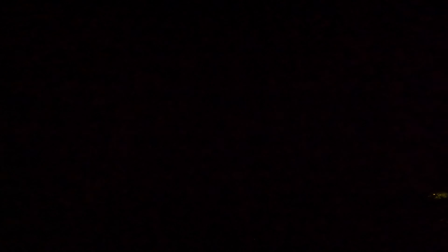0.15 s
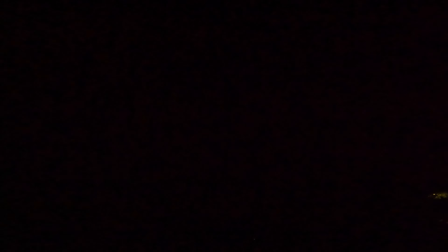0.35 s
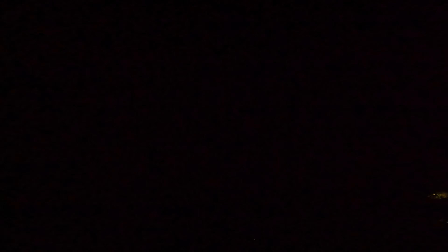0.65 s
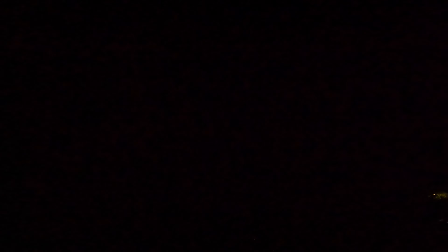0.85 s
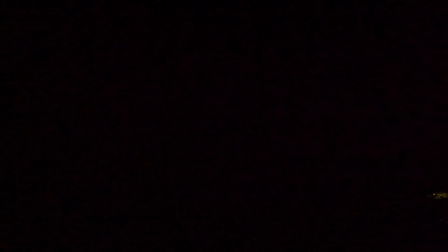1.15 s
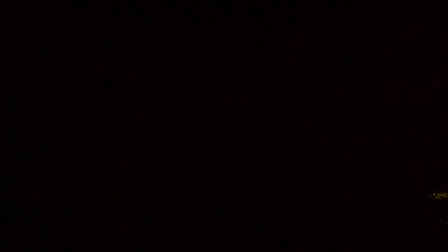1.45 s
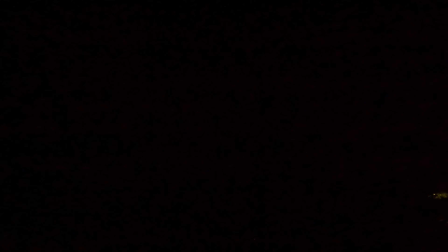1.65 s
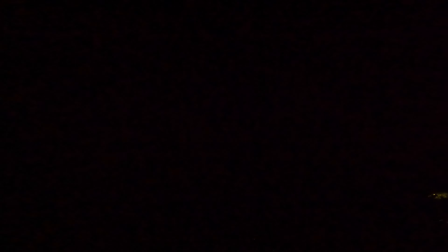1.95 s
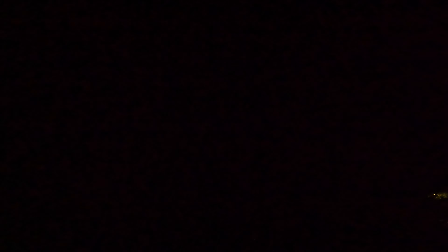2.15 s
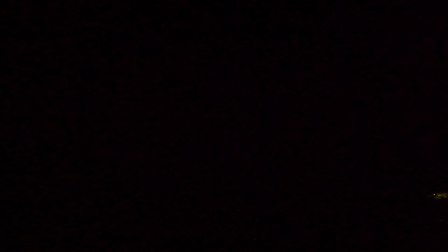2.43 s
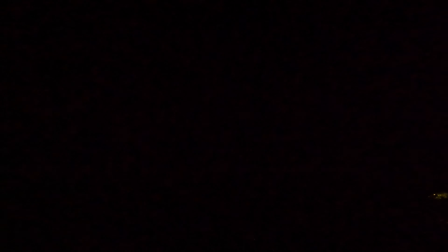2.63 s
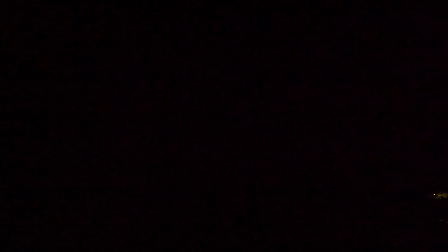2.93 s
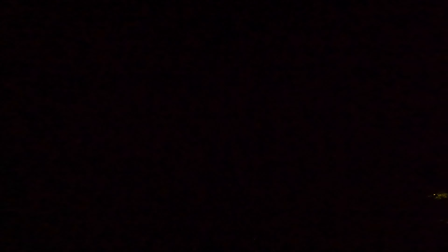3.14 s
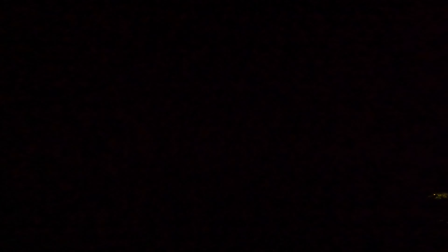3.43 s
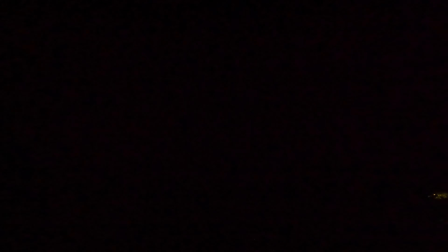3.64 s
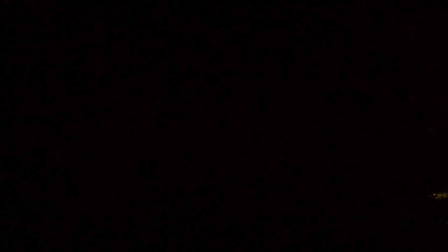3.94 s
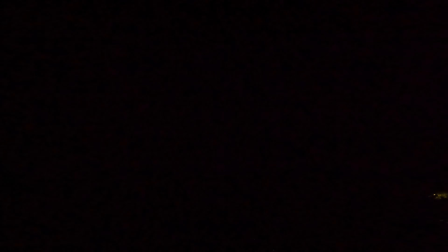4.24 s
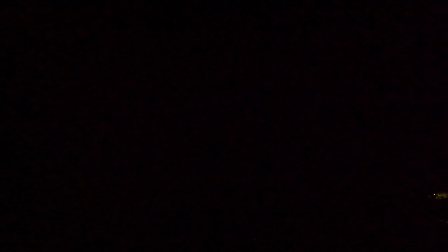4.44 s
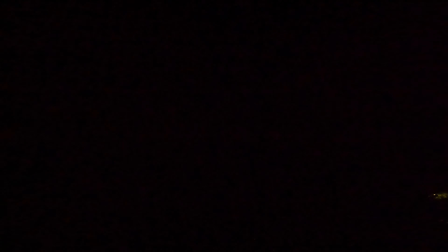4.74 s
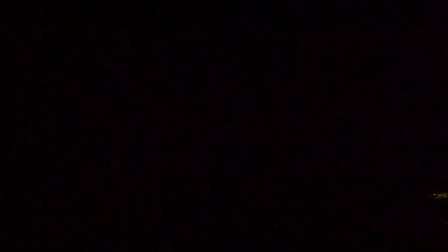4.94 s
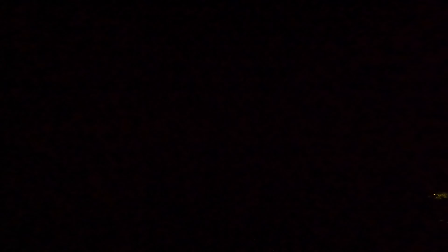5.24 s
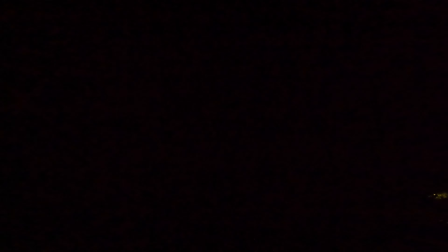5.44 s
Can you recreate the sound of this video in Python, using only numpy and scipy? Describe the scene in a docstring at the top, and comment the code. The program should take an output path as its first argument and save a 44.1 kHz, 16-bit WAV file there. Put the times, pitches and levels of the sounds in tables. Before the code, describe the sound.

Night rain outdoors, heard in mono from close to hard ground with a wall nearby. Throughout, a soft mid-pitched wash lies under irregular patter and many crisp, dry ticks of single drops, each with a tiny splash and quick reflection. The rain thickens from about 1 to 2.5 s, then thins a little. At 0 s a brief low thunder thud fades into a faint mutter; a few soft bumps come near 0.6 s, and from 1 s muffled thuds follow every tenth of a second or so. A heavier knock lands at 2.2 s. From 2.7 s the thunder surges: dense rumble, hollow booms and hard knocks crowd together, strongest around 2.9 to 3.7 s, with a rough tearing edge and slight crackle. It rolls on in uneven waves, with further strong knocks near 3.9, 4.5 and 4.95 s, still rumbling at the 5.6 s cut. Very faint, high cricket trills flutter at 1.6, 2.2 to 2.9 and 4.5 s.

```python
"""Thunder behind rain at night

Distant thunder mutters and swells into louder peals. Dense streams of shock fronts make the roll,
shaped noise makes the peals, and short pressure swings make the knocks that stand out of them.
Single drops tick on hard ground close by, filtered noise and random impacts make the rain around
them, and narrow bands of fluttering noise make a few faint cricket trills."""
import sys
import numpy as np
from scipy import signal
from scipy.fft import rfft, irfft
from scipy.io import wavfile
from scipy.ndimage import map_coordinates

SR = 44100
rng = np.random.default_rng(int(sys.argv[2]) if len(sys.argv) > 2 else 0)


def int16_out(signal):
    """Quantize to a 16-bit WAV file."""
    q = np.round(np.clip(np.atleast_2d(signal).T, -1, 1) * 32767)
    wavfile.write(sys.argv[1], SR, q.astype(np.int16))


N = 246061


def amp(db):
    """Decibels to gain."""
    return 10 ** (np.asarray(db) / 20)


def unit(x):
    """x at rms 1."""
    return x / np.sqrt(np.mean(x ** 2) + 1e-20)


def along(points, hz):
    """(Hz, value) points read on a log axis."""
    f, v = np.transpose(points)
    return np.interp(np.log(hz + 1), np.log(f + 1), v)


def curves(rows):
    """One value per sample for each column after the time."""
    s, *cols = np.transpose(rows)
    return [np.interp(np.arange(N) / SR, s, c) for c in cols]


def wobble(rate):
    """A smooth random curve, rate knots a second."""
    return map_coordinates(rng.standard_normal(int(N * rate / SR) + 4), [np.arange(N) * rate / SR])


def coloured(x, spectrum, size=8192):
    """x through a causal filter with the given spectrum."""
    cepstrum = irfft(np.log(amp(along(spectrum, np.fft.rfftfreq(size, 1 / SR)))))
    cepstrum[1:size // 2] *= 2
    cepstrum[size // 2 + 1:] = 0
    return signal.fftconvolve(x, irfft(np.exp(rfft(cepstrum))))[:len(x)]


def impacts(rate, spread_db):
    """Randomly timed impulses of either sign and log-normal size."""
    chance, size = rng.random(N), rng.standard_normal(N)
    return (chance < rate / SR) * rng.choice([-1, 1], N) * amp(spread_db * np.minimum(size, 2))


def steady(x, span):
    """x held at rms 1 over about span seconds, keeping its faster grain."""
    window = np.hanning(int(span * SR) + 3)
    power = signal.fftconvolve(x ** 2, window, "same") / signal.fftconvolve(np.ones(len(x)), window, "same")
    return x / np.sqrt(np.abs(power) + 1e-12)


def add(track, s, sound):
    """Mix sound into track from time s."""
    start = max(round(s * SR), 0)
    part = track[start:start + len(sound)]
    part += sound[:len(part)]


def resonant(x, modes):
    """x with a band around each resonance lifted or cut."""
    for hz, width_hz, lift_db in modes:
        x = x + (amp(lift_db) - 1) * signal.lfilter(*signal.iirpeak(hz, hz / width_hz, fs=SR), x)
    return x


# Peals that stand out of the roll. Each row: start in seconds, length in seconds, overall level in dB,
# then edge, deep part and boom in dB relative to it before their trims, and boom pitch in Hz.
PEAL_EVENTS = [(0, 0.016, -25.5, -8, 0, -2, 290), (0.203, 0.11, -45, -20, 10, -3, 158),
               (0.433, 0.02, -31, -12, -8, -8, 200), (0.529, 0.058, -33.5, -9, -6, -10, 218),
               (0.833, 0.028, -32.5, -12.5, -3, 1.5, 240), (0.966, 0.034, -38, 4.5, -8, -2, 283),
               (0.617, 0.031, -22, -20, -7, -5, 277), (1.019, 0.036, -19, -9, -8.5, -8.5, 253),
               (1.11, 0.032, -23, -17.5, -19, -9, 172), (1.189, 0.013, -20.5, -19, -18, -7, 310),
               (1.272, 0.022, -26, -10.5, -20, -3, 180), (1.376, 0.065, -22, -21, -27, -16, 154),
               (1.501, 0.019, -22, -10.5, -18, -0.5, 318), (1.61, 0.038, -22.5, -20.5, -12, -5, 176),
               (1.725, 0.066, -23, -14, -22, -3.5, 340), (1.771, 0.021, -23.5, -8.5, -20, -4, 344),
               (1.87, 0.052, -22, -19, -24, -12, 163), (2.04, 0.035, -21, -18, -13, -3, 312),
               (2.162, 0.044, -21.5, -9, -22, -5.5, 180), (2.34, 0.12, -19, -12, -17, -11, 158),
               (2.51, 0.04, -30, -15, -17, -1, 168), (2.655, 0.041, -27, 0.5, -9, -10, 273),
               (2.7, 0.054, -19.5, -2.5, -16, 3, 262), (2.759, 0.086, -13.5, -6.5, -26, -8, 296),
               (2.85, 0.02, -19, -4, -14, -2, 305), (2.89, 0.034, -18, -7.5, -14, -3.5, 297),
               (2.972, 0.048, -15.5, -11.5, -20, 3, 301), (3.024, 0.03, -16, -5.5, -24, -1.5, 310),
               (3.09, 0.022, -23, 0, -9, -13, 290), (3.191, 0.046, -19.5, -7, -15, -2, 231),
               (3.256, 0.03, -14.5, -6, -16, -7, 302), (3.35, 0.0067, -20, 3.5, -22, -9, 335),
               (3.535, 0.043, -18.5, -9, -19, -3, 356), (3.591, 0.055, -15.5, -11, -22, -3, 172),
               (3.852, 0.027, -14.5, -9.5, -33, -2.5, 320), (3.918, 0.029, -17.5, -6, -24, -3, 308),
               (4.075, 0.067, -24.5, -1.5, -15, -11, 262), (4.135, 0.042, -15.5, -10, -16, -2, 199),
               (4.211, 0.045, -17.5, -15, -21, -2.5, 260), (4.411, 0.027, -22.5, -3, -12, -6, 263),
               (4.651, 0.35, -20, -11.5, -13, -7.5, 275), (4.809, 0.049, -21, -12, -20, 3, 277),
               (4.864, 0.12, -15.5, -12, -24.5, -1, 237), (4.913, 0.04, -17.5, -7, -20, -5, 225),
               (5.062, 0.015, -12.5, -19, -21, -8, 281), (5.145, 0.042, -24.5, -7, -20, -1, 282),
               (5.23, 0.069, -25, -7, -32, 6.5, 274), (5.324, 0.085, -14.5, -13.5, -18, -9.5, 183)]
# Colour of the thunder's body. Each row: frequency in Hz, level in dB.
RUMBLE_COLOUR = [(40, -58), (80, -16.5), (125, 2.5), (165, 2.5), (225, -0.5), (310, -1), (400, -6.5),
                 (500, -8.5), (750, -31), (1500, -51.5), (3000, -110)]
# Colour of its tearing edge. Each row: frequency in Hz, level in dB.
EDGE_COLOUR = [(150, -50.5), (300, -13.5), (450, 2), (600, 1.5), (740, 3), (950, -1.5), (1250, -8.5),
               (1600, -17), (2100, -27.5), (3500, -79), (6000, -110)]
# Colour of its deepest part. Each row: frequency in Hz, level in dB.
DEEP_COLOUR = [(15, -42), (30, -30.5), (55, -13), (80, -4), (100, -1), (150, -19.5), (300, -76.5)]
# Resonances between the walls around the microphone. Each row: pitch in Hz, width in Hz, lift in dB.
WALL_MODES = [(155.4, 66, 2), (270, 15, -0.5), (310.5, 61, 4.5), (738, 50, 3), (962, 30, 3)]
PEAL_ATTACK_S, PEAL_SAG_DB, PEAL_T60_S = 0.00084, 4.5, 0.13  # rise, loss over its length, release
ONSET_DB, ONSET_S = -2.5, 0.0043  # the very start is held down, then let go
EDGE_TILT_DB, EDGE_CENTRE_HZ = -0.14, 726  # dB an octave for each dB of edge: a stronger edge is duller
KNOT_HZ, KNOT_WIDTH_HZ, KNOT_DB = 694, 150, 5.5  # typical pitch where a peal's edge bunches


def peals():
    """A stretch of channel lying broadside sends its fronts all at once; their spacing pitches the boom."""
    out = np.zeros(N)
    t = np.arange(SR // 2) / SR
    usual_edge_db = np.mean([row[3] for row in PEAL_EVENTS])
    for start, length, db, edge_db, deep_db, boom_db, boom_hz in PEAL_EVENTS:
        sag_db = -PEAL_SAG_DB * np.minimum(t / length, 1)
        release_db = -60 * np.maximum(t - length, 0) / PEAL_T60_S
        onset_db = ONSET_DB * np.exp(-t / ONSET_S)
        shape = (1 - np.exp(-t / PEAL_ATTACK_S)) * amp(sag_db + release_db + onset_db)

        tilt = EDGE_TILT_DB * (edge_db - usual_edge_db)
        tilted_edge = [(hz, level + tilt * np.log2(hz / EDGE_CENTRE_HZ)) for hz, level in EDGE_COLOUR]

        # one noise feeds the thud and its edge, another the boom and the deep part
        burst, train = rng.standard_normal((2, len(t)))
        thud = steady(resonant(coloured(burst, RUMBLE_COLOUR), WALL_MODES), span=0.016)
        edge = steady(resonant(coloured(burst, tilted_edge), WALL_MODES), span=0.016)
        knot_hz = KNOT_HZ * np.exp(0.15 * rng.standard_normal())
        edge = steady(resonant(edge, [(knot_hz, KNOT_WIDTH_HZ, KNOT_DB)]), span=0.059)
        band = signal.iirpeak(boom_hz, 4.5, fs=SR)
        boom = signal.lfilter(*band, signal.lfilter(*band, train))
        boom = steady(boom, span=0.041)
        deep = steady(coloured(train, DEEP_COLOUR), span=0.065)

        mix = amp(-6.0) * thud + amp(boom_db) * boom
        mix += amp(edge_db - 2.0) * edge + amp(deep_db - 4.5) * deep
        add(out, start, amp(db) * shape * mix)
    return out


def pulse(t, hz, cycles):
    """A pressure swing of a cycle or so, centred on t = 0, starting at a random point of its cycle."""
    swing = np.cos(2 * np.pi * (hz * t + rng.random()))
    return swing * np.exp(-0.5 * (hz * t / cycles) ** 2)


# Single shock fronts that knock out of the peals. Each row: centre in seconds, thump level in dB
# before the trim, thump pitch in Hz, crack level in dB relative to the thump.
KNOCK_EVENTS = [(0.008, -22, 330, -9.5), (0.626, -15.5, 322, -22), (1.023, -16.5, 335, -2),
                (1.384, -17, 200, -11), (1.468, -16, 221, -28), (1.507, -11.5, 280, -14),
                (1.638, -19, 170, -13), (1.664, -17, 192, -18), (1.905, -14.5, 170, -21),
                (2.055, -16, 280, -24), (2.174, -32, 264, -17), (2.193, -8.5, 253, -13.5),
                (2.362, -18, 170, -19), (2.444, -10.5, 220, -15), (2.703, -15, 220, -6),
                (2.765, -12, 260, -5), (2.787, -11, 249, -5), (2.862, -5, 265, -13), (2.974, -7.5, 253, -8),
                (3.036, -10, 260, -4), (3.094, -16, 240, -8), (3.198, -5, 210, -33),
                (3.272, -7.5, 280, -6.5), (3.289, -3.5, 248, -16), (3.355, -18.5, 280, -2),
                (3.54, -7, 220, -8), (3.571, -6.5, 230, -25), (3.598, -8, 222, -9), (3.639, -7, 173, -12),
                (3.925, -8, 290, -13), (3.961, -13, 232, -9), (4.149, -14, 228, -14),
                (4.174, -13, 189, -21), (4.219, -10, 220, -11.5), (4.242, -13, 280, -7.5),
                (4.524, -10, 192, -12), (4.66, -10, 250, -10), (4.919, -11, 217, -4.5),
                (4.954, -7, 240, -7.5), (5.334, -16, 202, -19), (5.403, -19, 250, -3.5)]
KNOCK_TRIM_DB, THUMP_CYCLES, CRACK_CYCLES = -3.5, 0.43, 0.91  # level, half-widths of thump and crack
KNOCK_LOW_HZ = 60  # the knocks carry nothing below this
FULL_CRACK_HZ, CRACK_DB_PER_OCTAVE = 1245, 12.5  # pitch of a 0 dB crack, loss for each octave lower


def knocks():
    """A lone strong front: a thump with a crack on top, ringing briefly between the walls."""
    out = np.zeros(N)
    lead = SR // 80 / SR  # room before the centre, in whole samples
    t = np.arange(SR // 10) / SR - lead
    for centre, db, hz, crack_db in KNOCK_EVENTS:
        # a fainter crack has come further and is duller
        crack_hz = FULL_CRACK_HZ * 2 ** (crack_db / CRACK_DB_PER_OCTAVE)
        thump = pulse(t, hz, THUMP_CYCLES)
        crack = amp(crack_db) * pulse(t, crack_hz, CRACK_CYCLES)
        add(out, centre - lead, amp(db + KNOCK_TRIM_DB) * resonant(thump + crack, WALL_MODES))
    highpass = signal.butter(2, KNOCK_LOW_HZ, "high", fs=SR, output="sos")
    return signal.sosfilt(highpass, out)


# The unbroken roll under the peals. Each row: time in seconds, then rumble and tearing edge
# in dB before their trims.
ROLL_LEVELS = [(0.0, -35.5, -64), (0.29, -38.5, -56), (1.26, -31.5, -46.5), (1.7, -30.5, -44.5),
               (2.22, -28.5, -41.5), (2.6, -24.5, -33), (2.72, -23.5, -29), (2.87, -23, -29),
               (3.18, -24.5, -31.5), (3.44, -25.5, -36.5), (3.84, -24.5, -32), (4.15, -22.5, -30.5),
               (4.33, -26, -33.5), (4.55, -25.5, -33), (4.9, -24, -26), (5.04, -27, -31.5),
               (5.36, -24.5, -29.5), (5.58, -25, -33.5)]
# The deepest part of the roll. Each row: time in seconds, level in dB before the trim.
DEEP_LEVELS = [(0.0, -38.5), (1.17, -43), (2.91, -36), (2.97, -28), (3.12, -45), (3.25, -29.5), (3.46, -59),
               (3.53, -34), (3.95, -42), (3.99, -34), (4.37, -54), (4.41, -35.5), (5.56, -42.5),
               (5.58, -38)]
# Only the nearest branches keep their crackle; its level. Each row: time in seconds, level in dB.
CRACKLE_LEVELS = [(2.2, -58), (2.66, -47.5), (2.79, -39), (3.04, -45.5), (3.15, -51.5), (3.28, -43),
                  (3.45, -57), (4.15, -48), (4.45, -54), (5.58, -54)]
# Colour of the crackle. Each row: frequency in Hz, level in dB.
CRACKLE_COLOUR = [(500, -38.5), (1100, -7), (1600, 1), (1850, -4), (2150, -13.5), (2700, -27), (4000, -62)]
RUMBLE_TRIM_DB, EDGE_TRIM_DB, DEEP_TRIM_DB = 0.44, -0.45, -1.5


def roll():
    """Shock fronts arrive in a dense stream; those from nearer branches keep their tearing edge."""
    rumble_db, edge_db = curves(ROLL_LEVELS)
    deep_db, = curves(DEEP_LEVELS)
    crackle_db, = curves(CRACKLE_LEVELS)
    fronts = impacts(rate=800, spread_db=0.5)
    lumps = wobble(35)  # fronts bunch at kinks in the channel

    rumble = steady(resonant(coloured(fronts, RUMBLE_COLOUR), WALL_MODES), span=0.061)
    rumble *= amp(rumble_db + RUMBLE_TRIM_DB + 1.5 * lumps)
    edge = steady(resonant(coloured(fronts, EDGE_COLOUR), WALL_MODES), span=0.059)
    edge *= amp(edge_db + EDGE_TRIM_DB + 2.0 * lumps)
    deep = steady(coloured(impacts(rate=390, spread_db=-2.0), DEEP_COLOUR), span=0.14)
    deep *= amp(deep_db + DEEP_TRIM_DB)
    crackle = unit(coloured(impacts(rate=300, spread_db=4.5), CRACKLE_COLOUR))
    crackle *= amp(crackle_db + 2 * lumps)
    return rumble + edge + crackle + deep


# Lag of the thunder's echo from the wall, shrinking as the sound moves along the sky.
# Each row: time in seconds, delay in seconds.
WALL_DELAYS = [(3.2, 0.00448), (4.2, 0.00418)]
WALL_ECHO_DB, WALL_LOW_HZ = -13.5, 510  # the wall is too small to return lower notes


def off_the_wall(thunder):
    """The wall returns the upper body a moment later, cutting a comb that slides as the delay shrinks."""
    delay_s, = curves(WALL_DELAYS)
    highpass = signal.butter(2, WALL_LOW_HZ, "high", fs=SR, output="sos")
    upper = signal.sosfiltfilt(highpass, thunder)
    t = np.arange(N) / SR
    return thunder + amp(WALL_ECHO_DB) * np.interp(t - delay_s, t, upper, left=0)


def tick(t, hz, cycles):
    """A sudden swing whose envelope peaks after the given cycles and soon dies."""
    u = hz * np.maximum(t, 0) / cycles
    return (u * np.exp(1 - u)) ** 2 * np.sin(2 * np.pi * hz * t)


# The biggest near drops. Each row: time in seconds, tick level in dB before the trim, pitch in Hz,
# splash in dB relative to the tick before its trim.
BIG_DROPS = [(0.0299, -24.0, 2200, -28), (0.0536, -33, 2600, -29), (0.0727, -29, 3300, -13),
             (0.1941, -32, 3300, -31), (0.2058, -21, 2400, -17), (0.2185, -34, 2300, -15),
             (0.4117, -30, 2500, -21), (0.451, -31, 2400, -25), (0.4726, -29.5, 2300, -5),
             (0.5187, -24, 1900, -5.5), (0.6052, -24, 3100, -15), (0.618, -23.5, 2400, -8),
             (0.6268, -31, 3000, -15), (0.6343, -27, 2700, -13), (0.6745, -24.5, 2800, -26),
             (0.6832, -25, 3500, -15), (0.7573, -25, 3000, -20), (0.8059, -26.5, 2500, -24),
             (0.8152, -27, 2900, -27), (0.8606, -24.5, 2400, -17), (0.9014, -28, 3100, -10),
             (0.918, -21.5, 2700, -26), (0.9222, -32, 3200, -32), (0.9273, -31, 4100, -11),
             (0.9583, -26, 2400, -12), (0.9904, -27, 4800, -3), (0.995, -18.5, 2800, -22),
             (1.0304, -28, 3000, -13), (1.0501, -23, 2900, -21), (1.1102, -21, 2500, -10.5),
             (1.1214, -30, 2700, -23), (1.1783, -18.5, 3300, -15), (1.1831, -23, 3400, -17),
             (1.1872, -16.5, 2900, -24), (1.2248, -27, 3700, -12), (1.2318, -22.5, 2000, -26),
             (1.2879, -26.0, 2500, -11), (1.2983, -26.0, 3900, -23), (1.3434, -31, 3700, -4),
             (1.4159, -25, 3500, -11), (1.4251, -26, 3500, -13), (1.4417, -34, 4100, -12),
             (1.4986, -25, 2600, -19), (1.5193, -28.5, 3400, -14), (1.5381, -23, 2700, -16),
             (1.5443, -28, 3400, -19), (1.6112, -28.0, 3300, -13), (1.6206, -27, 2500, -17),
             (1.627, -26, 3600, -17), (1.6845, -22.5, 4500, -18), (1.75, -28, 3200, -18),
             (1.7725, -23, 3300, -18), (1.7797, -26, 2100, -7), (1.8748, -32, 2200, -12),
             (1.8903, -29, 3000, -16), (1.9349, -28.5, 3600, -10), (1.9534, -30, 2200, -12),
             (1.961, -26, 2400, -13), (1.9827, -26.5, 2400, -16), (2.0433, -23, 2800, -19),
             (2.0918, -23.5, 2300, -22), (2.1276, -22.5, 4000, -17), (2.1939, -23, 3400, -24),
             (2.2604, -31, 2600, -20), (2.2754, -36, 4300, -9), (2.2887, -29, 2100, -14),
             (2.2991, -28, 2300, -35), (2.3263, -30, 2400, -3), (2.3317, -34, 2600, -15),
             (2.3731, -28.0, 2300, -6), (2.431, -30, 2300, -12), (2.4616, -25.5, 2100, -19),
             (2.521, -29, 2700, -4), (2.5288, -22, 2400, -23), (2.6292, -27.5, 2600, -17),
             (2.7648, -31, 2100, -4), (2.85, -22.0, 2500, -8), (3.0202, -29, 3200, -11),
             (3.218, -28.0, 2100, -19), (3.2398, -28.5, 2900, -19), (3.4585, -35, 4400, -5),
             (3.4647, -26.5, 3300, -23), (3.4718, -35, 3100, -32), (3.4953, -30, 2600, -16),
             (3.5639, -21.5, 2200, -9), (3.6744, -34, 2200, -5.5), (3.7112, -28, 2100, -32),
             (3.7557, -29, 3700, -14), (3.8537, -25, 2700, -10), (3.8607, -27.5, 3100, -15),
             (3.9761, -32, 2800, -6), (4.0809, -26, 2700, -21), (4.0975, -31.0, 3100, -6),
             (4.1193, -30, 2500, -18), (4.146, -24.5, 2100, -4), (4.2276, -29.5, 4800, -4.5),
             (4.3098, -30.5, 2500, -9), (4.3535, -23.5, 3200, -23), (4.5011, -31, 2100, -10),
             (4.5786, -31.5, 4200, -10), (4.6495, -28, 4100, -8), (4.6986, -31, 2600, -11),
             (4.8439, -30, 3000, -9), (4.867, -30, 2500, -11), (4.9186, -29, 3200, -8),
             (4.9234, -26, 2400, -15), (4.9542, -29.0, 3800, -14), (4.9899, -28.5, 2700, -17),
             (5.0, -26.5, 4400, -16), (5.0116, -29, 3200, -15), (5.0263, -27.5, 2200, -26),
             (5.1147, -25, 3200, -31), (5.1383, -33, 2800, -13), (5.1972, -27, 3400, -8),
             (5.2212, -26.5, 3300, -13), (5.2254, -32, 3400, -18), (5.2778, -32.5, 2800, -4.5),
             (5.312, -24.5, 2200, -17), (5.3746, -27, 3000, -8), (5.3866, -29.5, 2600, -31),
             (5.4576, -27.5, 2600, -24), (5.5039, -29, 3300, -15), (5.511, -25.5, 3200, -17),
             (5.5214, -30.5, 2300, -9), (5.5429, -34, 3700, -12)]
# Colour of the spray. Each row: frequency in Hz, level in dB.
SPLASH_COLOUR = [(1000, -23.5), (3000, 0), (4700, 5), (6800, 0), (8500, -12.5), (10800, -25),
                 (12000, -35.5), (14000, -43.5)]
# Colour of a tick's diffuse tail. Each row: frequency in Hz, level in dB.
TAIL_COLOUR = [(300, -24.5), (1000, 1), (2200, 4), (3600, -7.5), (5000, -12), (7000, -23.5), (12000, -55.5)]
DROP_TRIM_DB, DROP_CYCLES = 0.65, 0.63  # level, typical cycles to the tick's peak
SPLASH_TRIM_DB, SPLASH_T60_S = 4, 0.002  # spray level and its time to fall by 60 dB
TAIL_T60_S = 0.06
SLAP_DB, SLAP_HZ, SLAP_CYCLES = -8, 1450, 0.36  # the duller slap of the ground under the tick
ECHO_BASE_S, ECHO_DB = 0.0038, -10.5  # a wall close by repeats each hit: lag before its scatter, level
SMALL_DROP_DB, SMALL_DROP_SPREAD_DB, SMALL_SPLASH_DB = 12, -1, -18  # over the rain, scatter, splash


def near_drops():
    """A drop hits hard ground with one sharp swing and a little spray; the surroundings answer."""
    out = np.zeros(N)
    lead = SR // 500 / SR  # room before the hit, in whole samples
    t = np.arange(SR // 20) / SR - lead

    def dying(t60):
        """Silence before the hit, then a fall of 60 dB in t60 seconds."""
        return (t >= 0) * amp(-60 * np.abs(t) / t60)

    rain_db, = curves(RAIN_LEVELS)
    small_drops = []
    for i in rng.integers(N, size=70):  # smaller drops fall at random
        db = rain_db[i] + SMALL_DROP_DB + SMALL_DROP_SPREAD_DB * rng.standard_normal()
        hz = 2500 * np.exp(0.33 * rng.standard_normal())
        small_drops.append((i / SR, db, hz, SMALL_SPLASH_DB))

    for start, db, hz, splash_db in list(BIG_DROPS) + small_drops:
        spray, scatter = rng.standard_normal((2, len(t)))
        # a short burst with a fainter, longer tail
        spray = spray * (dying(SPLASH_T60_S) * amp(-1.0) + dying(TAIL_T60_S) * amp(-16.5))
        splash = amp(SPLASH_TRIM_DB + splash_db) * coloured(spray, SPLASH_COLOUR)
        cycles = DROP_CYCLES * np.exp(0.1 * rng.standard_normal())  # every spot is damped differently
        slap = amp(SLAP_DB) * tick(t, SLAP_HZ, SLAP_CYCLES)
        hit = tick(t, hz, cycles) + slap + splash
        tail = amp(-20 + 9.0) * coloured(scatter * dying(TAIL_T60_S), TAIL_COLOUR)
        level_db = db + DROP_TRIM_DB
        add(out, start - lead, amp(level_db) * (hit + tail))
        lag = ECHO_BASE_S * rng.uniform(0.93, 1.3)
        add(out, start - lead + lag, amp(level_db + ECHO_DB) * hit)
    return out


# Loudness of the rain. Each row: time in seconds, level in dB before the layer trims.
RAIN_LEVELS = [(0.0, -48.5), (0.64, -47.5), (1.09, -45), (1.66, -44), (2.44, -44.5), (3.33, -50.5),
               (4.43, -49), (5.27, -49), (5.58, -48.5)]
# Colour of the far wash. Each row: frequency in Hz, level in dB.
WASH_COLOUR = [(100, -21), (400, 4), (900, 3), (2000, -2.5), (3300, -2), (4700, -6), (6600, -15),
               (8500, -26), (11000, -33), (12000, -43), (14000, -45.5)]
# Colour of the closer patter. Each row: frequency in Hz, level in dB.
PATTER_COLOUR = [(200, -28), (700, 2.5), (1800, 2.5), (3300, -3.5), (4700, -8), (6600, -14), (8500, -23.5),
                 (11000, -29.5), (12000, -36), (14000, -40.5)]


def rain():
    """Far drops merge into a wash; closer ones patter, each at the pitch of the spot that it hits."""
    rain_db, = curves(RAIN_LEVELS)
    wash = unit(coloured(rng.standard_normal(N), WASH_COLOUR))
    spots = np.zeros(N)
    for hz in np.geomspace(1300, 6000, num=7):
        spot = signal.iirpeak(hz, 2.1, fs=SR)
        spots += signal.lfilter(*spot, impacts(rate=32, spread_db=2.5))
    patter = unit(coloured(spots, PATTER_COLOUR))

    # drops on wet ground burst into a millisecond or two of spray
    fade = np.exp(-1 / (0.0011 * SR))
    spray_power = signal.lfilter([1], [1, -fade], impacts(rate=99, spread_db=3.0) ** 2)
    splats = unit(coloured(np.sqrt(spray_power) * rng.standard_normal(N), PATTER_COLOUR))

    flurry = amp(0.8 * wobble(9.5))  # drops come in small bunches
    close = flurry * (amp(-2.5) * patter + amp(-3) * splats)
    return amp(rain_db) * (amp(-1.0) * wash + close)


# Far cricket trills. Each row: start in seconds, end in seconds, pitch in Hz, level in dB.
CRICKET_TRILLS = [(1.55, 1.71, 4480, -56.5), (2.20, 2.48, 4545, -58.5), (2.50, 2.80, 4400, -60.5),
                  (2.76, 2.93, 4410, -65), (4.50, 4.88, 4510, -66)]


def crickets():
    """Far trills, smeared by distance into a narrow, fluttering band of noise."""
    out = np.zeros(N)
    for start, end, hz, db in CRICKET_TRILLS:
        t = np.arange(int(max(end - start, 0.05) * SR)) / SR
        band = signal.lfilter(*signal.iirpeak(hz, 70, fs=SR), rng.standard_normal(len(t)))
        strokes = 1 + 0.5 * np.sin(2 * np.pi * 45 * t)  # 45 strokes a second
        trill = unit(steady(band, span=0.037) * strokes)
        add(out, start, amp(db) * trill * signal.windows.tukey(len(t), 0.3))
    return out


def scene():
    """Thunder with its wall echo, near drops, rain and crickets, mixed to one channel."""
    thunder = off_the_wall(roll() + peals() + knocks())
    return (thunder + near_drops() + rain() + crickets())[None]


# Colour of the microphone port. Each row: frequency in Hz, width in Hz, lift in dB.
PORT_MODES = [(4250, 280, 0), (9120, 730, -18.5), (10700, 500, 7.5)]
TOP_HZ = 13500  # band limit of the recorder


def record(dry):
    """The microphone port colours the treble; the recorder keeps almost nothing above its band limit."""
    lowpass = signal.ellip(10, 0.1, 90, TOP_HZ, fs=SR, output="sos")
    soft_ends = signal.windows.tukey(N, 0.001)
    return signal.sosfilt(lowpass, resonant(dry, PORT_MODES)) * soft_ends


dry = scene()
out = record(dry)
int16_out(out)
```